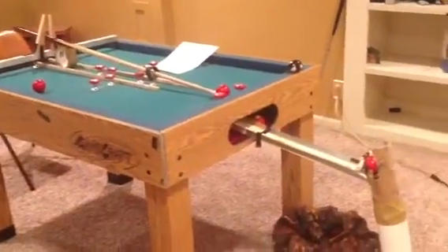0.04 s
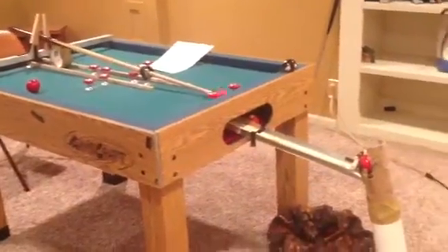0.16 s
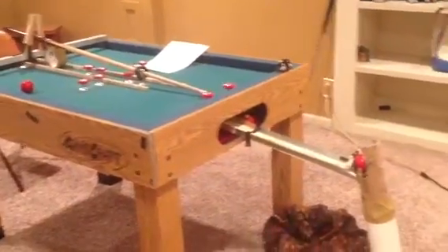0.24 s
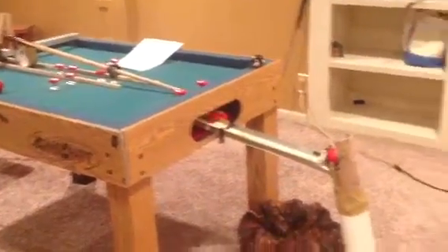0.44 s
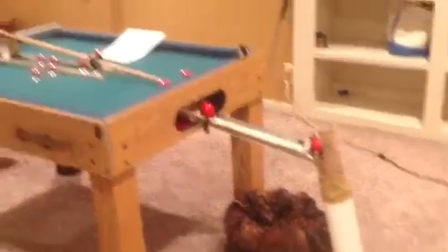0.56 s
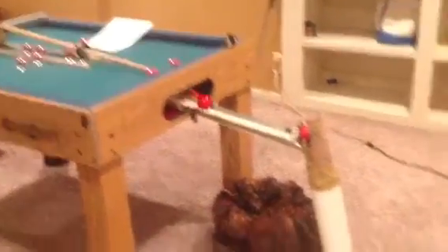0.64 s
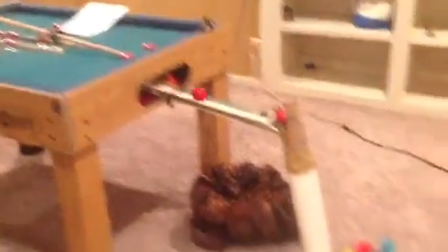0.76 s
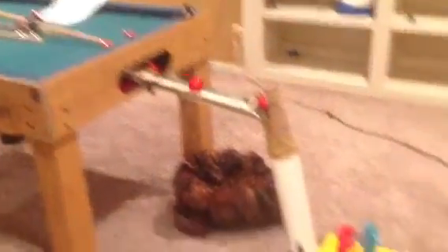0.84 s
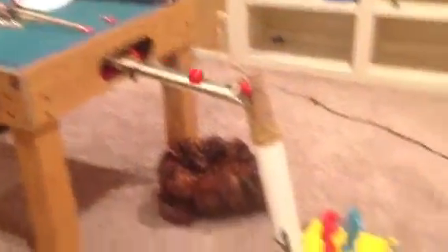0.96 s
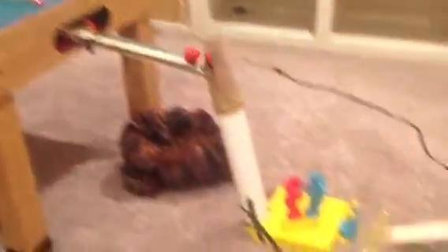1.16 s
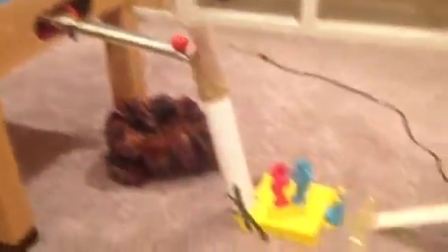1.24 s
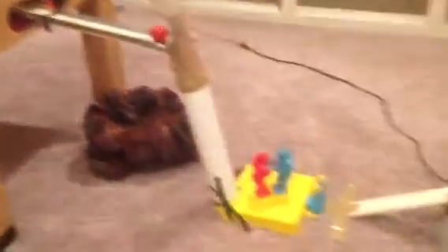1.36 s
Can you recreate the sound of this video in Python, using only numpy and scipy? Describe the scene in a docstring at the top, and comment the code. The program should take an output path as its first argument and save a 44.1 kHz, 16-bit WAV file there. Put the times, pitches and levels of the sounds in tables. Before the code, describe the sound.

In a quiet, slightly echoing room, a hard ball rattles against hollow wood and bounces onto a metal rail with bright, ringing clacks. A low roll follows, then a click against another ball and a soft bump on cardboard.

```python
"""Ball in a games table

A small hard ball knocks about in a wooden games table, where loose pieces tick, then clatters onto a
ringing metal track and rolls down it with a hollow rumble and one dull thud. At the far end it clacks
against a second ball, which bumps into a cardboard tube. Each blow is a short push that sets a body
sounding, and a quiet, fairly live room answers it."""
import sys
import numpy as np
from scipy import signal
from scipy.fft import rfft, irfft
from scipy.io import wavfile

SR = 44100
rng = np.random.default_rng(int(sys.argv[2]) if len(sys.argv) > 2 else 0)


def transcribe(u):
    """Save the signal u as a 16-bit wav file named by the first command-line argument.

    u: samples, shape (n,) or (channels, n), limited to [-1, 1]; the rate is SR.
    q: integer samples, one column per channel.
    """
    v = np.clip(np.atleast_2d(u).T, -1, 1)
    q = np.round(v * 32767).astype(np.int16)
    wavfile.write(sys.argv[1], SR, q)


N = 61739
T = np.arange(N) / SR

# spectrum of the dense crack of wood and cardboard: f/Hz, level/dB
WOOD_SPECTRUM = [(60, -54.5), (130, -9), (240, 1.5), (315, 1.5), (490, 5), (600, -2), (780, 7), (1070, 1.5),
                 (1300, 8.5), (1800, 8), (2400, -2.5), (3300, -8.5), (15000, -53)]
# spectrum of a thin tick: f/Hz, level/dB
TICK_SPECTRUM = [(1000, -32), (3800, -4.5), (6500, -2.5), (9000, -6), (15000, -1)]
WOOD_T60_S, TICK_T60_S = 0.07, 0.021


def table_knocks():
    """The ball knocks about in the table; harder contacts sound the wood more brightly."""
    # t/s, level/dB, contact corner f/Hz
    knocks = [(.179, -12, 680), (.2272, -6, 2420), (.2335, -9, 1700), (.2385, -3.5, 2090),
              (.2445, -4, 1820), (.265, -12, 2020), (.3105, 0, 3040), (.418, -7.5, 1750), (.468, -9, 510),
              (.509, -6.5, 900), (.536, -6, 1100), (.569, -14.5, 900), (.664, -7.5, 990), (.697, -12, 1620),
              (1.092, -24.5, 2160)]
    return strike(knocks, wood, room_db=-1.5)


def wood():
    """Response of the table: hollow modes under a dense crack."""
    # f/Hz, level/dB, t60/s
    table_modes = [(263, -1.5, 0.067), (361.6, -11, 0.28), (482, -1.5, 0.16), (532, -12.5, 0.48),
                   (707.4, 6.5, 0.086), (777, 3, 0.12), (836, -5.5, 0.51), (957, 5.5, 0.07),
                   (1243, 14, 0.052)]
    return undb(-7) * ring(table_modes) + undb(-4.5) * crack(WOOD_SPECTRUM, WOOD_T60_S)


def ball_clacks():
    """The hard ball gives short, bright clacks."""
    # t/s, level/dB, contact corner f/Hz
    clacks = [(.304, -17.5, 6000), (.3062, -4.5, 6500), (.3105, -0.5, 4230), (.3145, -6, 3800),
              (.3715, -3, 4440), (.3745, -4.5, 3130), (.418, -17, 5270), (.505, -12, 3300),
              (.667, -25.5, 5160), (.6975, -25.5, 5040)]
    # f/Hz, level/dB
    clack_spectrum = [(200, -43), (900, -12.5), (2700, 2), (4000, -4), (5200, -2.5), (6700, -14.5),
                      (8200, -14.5), (15000, -24.5)]
    return strike(clacks, lambda: undb(-3.5) * crack(clack_spectrum, t60=0.044), room_db=-5.5)


def metal_track():
    """The track clunks and rings on under the bouncing ball; each spot stirs its modes differently."""
    # t/s, level/dB, contact corner f/Hz
    blows = [(.3158, 4, 3000), (.3262, -12.5, 2500), (.3742, 1, 2610), (.4085, -1, 1680), (.5074, -2, 1640)]
    # long-ringing modes of the metal: f/Hz, level/dB, t60/s
    ringing_modes = [(1255, -2, .29), (1308, -2, .29), (1390, -2, .3), (1535, -8, .35), (1622, -4, .4),
                     (1690, -12, .3), (1728, -6, .42), (1805, -9, .4), (2595, -19, .35), (2950, -20, .3)]
    # its heavily damped modes: f/Hz, level/dB, t60/s
    clunk_modes = [(1339, -6, 0.056), (1460, -2, 0.019), (1666, -2, 0.023)]
    detune = 0.0053  # relative spread of each mode's pitch from blow to blow

    def ringing():
        stirred = [(hz * (1 + detune * rng.standard_normal()), db, t60) for hz, db, t60 in ringing_modes]
        partials = [rng.choice([-1, 1]) * undb(db) * ring([(hz, 0, t60)]) for hz, db, t60 in stirred]
        return undb(-5) * unit(sum(partials))

    clunk = undb(2) * ring(clunk_modes)
    return strike(blows, ringing, room_db=-4.5) + strike(blows, lambda: clunk, room_db=-4)


def ball_on_ball():
    """One ball clacks against the next and leaves a glassy ring."""
    # t/s, level/dB, contact corner f/Hz
    contact = [(1.1256, -12.5, 11900)]
    # f/Hz, level/dB
    clack_spectrum = [(200, -23), (1080, -6), (1290, 4.5), (2050, -0.5), (2300, 0.5), (3000, 4.5),
                      (3700, 9.5), (4500, 3), (5300, -1), (6900, -14.5), (8200, -6), (10500, -29),
                      (15000, -24)]
    # f/Hz, level/dB, t60/s
    glassy_modes = [(3490, -4, .4), (3607, -2, .35), (3725, -3, .4), (3989, -4, .36), (4199, -4, .4),
                    (4400, -4, .28), (5012, -4, .24), (8250, -4, .14)]
    clack = strike(contact, lambda: undb(0.5) * crack(clack_spectrum, t60=0.016), room_db=5)
    glassy = strike(contact, lambda: undb(-8) * ring(glassy_modes), room_db=-17)
    return clack + glassy


def cardboard_tube():
    """The second ball bumps into the tube: soft contacts on hollow, quickly damped modes."""
    # t/s, level/dB, contact corner f/Hz
    bumps = [(1.1912, -17, 1300), (1.198, -16.5, 560), (1.388, -26.5, 1120)]
    # f/Hz, level/dB, t60/s
    tube_modes = [(235.4, 4.5, 0.18), (480, 16, 0.04), (830, 5, 0.022), (876, -2.5, 0.11),
                  (900, 13.5, 0.043), (1239, 17.5, 0.058)]
    hollow = undb(2) * ring(tube_modes)
    return strike(bumps, lambda: hollow + undb(0.5) * crack(WOOD_SPECTRUM, WOOD_T60_S), room_db=7)


def loose_pieces():
    """Loose pieces and metal fittings tick on top of the knocks, each at its own pitch."""
    # t/s, level/dB, f/Hz (both ring pitch and contact corner)
    ticks = [(0.2275, -25.5, 7860), (.238, -29, 10100), (0.251, -26.5, 7670), (0.2661, -26.5, 8770),
             (0.3047, -19.5, 5500), (.3105, -19, 4700)]

    def tick(hz):
        ping = ring([(hz, 0, 0.012)])
        return undb(1.5) * crack(TICK_SPECTRUM, TICK_T60_S) + undb(-2) * ping

    return sum(strike([(s, db, hz)], lambda: tick(hz), room_db=1.5) for s, db, hz in ticks)


def light_touches():
    """The travelling ball makes a few faint, unpitched ticks."""
    # t/s, level/dB, contact corner f/Hz
    touches = [(.881, -34, 4100), (1.26, -22, 4440), (1.36, -31, 4500)]
    return strike(touches, lambda: crack(TICK_SPECTRUM, TICK_T60_S), room_db=1.5)


def thud():
    """One dull thud: a few low cycles that swell and die, faintly held by the room."""
    start_s, rise_s, pitch_hz = 0.7335, 0.0045, 157
    age = np.maximum(T - start_s, 0)
    swell = age / rise_s * np.exp(1 - age / rise_s)
    direct = undb(-24) * swell * np.sin(2 * np.pi * pitch_hz * age)
    reverb = np.linalg.norm(direct) * unit(through(direct, room()))
    return direct + undb(-19) * reverb


def rolling():
    """Once the ball is on the track, tiny bumps under it sound the table and merge into a rumble."""
    # loudness of the roll: t/s, level/dB
    level_curve = [(.42, -74), (.5, -45.5), (.8, -51.5), (.9, -54), (1.0, -48), (1.06, -49), (1.12, -39.5),
                   (1.18, -53), (1.4, -50)]
    # how the soft bumps weight the wood's sound: f/Hz, level/dB
    roll_spectrum = [(170, -7), (470, 2), (1200, -24), (4000, -22.5)]
    bumps_per_s, scatter_db = 1200, 3.5
    impulses = (rng.random(N) < bumps_per_s / SR) * rng.choice([-1, 1], N)
    bumps = impulses * undb(scatter_db * rng.standard_normal(N))
    bumps_in_room = bumps + through(bumps, room())
    rumble = colour(through(bumps_in_room, wood()), roll_spectrum)
    level_db = np.interp(T, *np.array(level_curve).T, left=-np.inf)
    return rumble / rumble.std() * undb(level_db)


def room():
    """Strong early reflections from table and walls, then a diffuse tail whose treble dies first."""
    # decay by band: f/Hz, t60/s
    decays = [(150, 0.94), (500, .48), (1400, 0.56), (3700, 0.55), (12000, 0.28)]
    gap_s, build_s = 0.001, 0.0034
    noise, hz = rfft(rng.standard_normal(N)), np.fft.rfftfreq(N, 1 / SR)
    tail = np.zeros(N)
    for centre, t60 in decays:
        band = on_log_axis([(f, f == centre) for f, _ in decays], hz)
        tail += irfft(noise * band, N) * fade(t60)
    early_lift = 1 + undb(3) * fade(t60=0.087)
    onset = np.clip((T - gap_s) / build_s, 0, 1)
    return unit(tail * early_lift * onset)


def room_tone():
    """A faint, steady bed of low noise."""
    # f/Hz, level/dB
    air_spectrum = [(40, -14.5), (160, 0), (320, -4), (600, -13), (1500, -14), (3500, -21.5), (15000, -30)]
    air = colour(rng.standard_normal(N), air_spectrum)
    return undb(-60.5) * air / air.std()


def strike(events, body, room_db):
    """Each contact is a short push, longer when softer, sounding the body and room from its own spot."""
    hit_gain_db = 11.5
    out = np.zeros(N)
    for s, db, corner_hz in events:
        start, response = int(s * SR), body()
        heard = response + undb(room_db) * unit(through(response, room()))
        push = signal.butter(2, min(corner_hz, .45 * SR), fs=SR)
        out[start:] += undb(db + hit_gain_db) * signal.lfilter(*push, heard)[:N - start]
    return out


def ring(modes):
    """Response of a set of decaying modes, each swinging up within its first cycle."""
    return unit(sum(undb(db) * fade(t60) * np.minimum(hz * T, 1) * np.sin(2 * np.pi * hz * T)
                    for hz, db, t60 in modes))


def crack(spectrum, t60):
    """Response of many short, crowded modes: a noise burst, evened out and then coloured."""
    burst = rfft(rng.standard_normal(N) * fade(t60))
    even = irfft(burst / np.sqrt(np.abs(burst)), N) * fade(2 * t60)
    return unit(colour(even, spectrum))


def colour(x, spectrum):
    """Minimum-phase filter shaped by (f/Hz, level/dB) points."""
    size = 4096
    gain = undb(on_log_axis(spectrum, np.fft.rfftfreq(size, 1 / SR)))
    cepstrum = irfft(np.log(gain))
    cepstrum[1:size // 2] *= 2
    cepstrum[size // 2 + 1:] = 0
    return through(x, irfft(np.exp(rfft(cepstrum))))


def on_log_axis(points, hz):
    """Interpolate (f/Hz, value) points along log frequency."""
    f, v = np.array(points, float).T
    return np.interp(np.log(np.maximum(hz, 1)), np.log(f), v)


def through(x, response):
    """Pass a sound through an impulse response."""
    return signal.fftconvolve(x, response)[:N]


def fade(t60):
    """Exponential decay by 60 dB in t60 seconds."""
    return np.exp(-np.log(1000) * T / t60)


def undb(db):
    """Decibels to gain."""
    return 10 ** (np.asarray(db) / 20)


def unit(x):
    """Scale to unit energy."""
    return x / np.sqrt(np.sum(x ** 2))


def scene():
    """The ball's run from table to track to tube, in mono over the room tone."""
    air = room_tone()
    table = loose_pieces() + light_touches() + table_knocks()
    track = ball_clacks() + metal_track() + thud() + rolling()
    far_end = ball_on_ball() + cardboard_tube()
    return (table + track + far_end + air)[None]


def record(dry):
    """The microphone thins the bass and rounds peaks; the recorder thins it again and cuts the top."""
    low_cut_hz, top_hz, ceiling = 95, 15300, 0.74
    low_cut = signal.butter(1, low_cut_hz, "high", fs=SR, output="sos")
    top_cut = signal.ellip(8, .2, 80, top_hz, fs=SR, output="sos")
    thin = signal.sosfilt(low_cut, dry)
    rounded = thin / (1 + (thin / ceiling) ** 8) ** (1 / 8)
    return signal.sosfilt(top_cut, signal.sosfilt(low_cut, rounded))


dry = scene()
out = record(dry)
transcribe(out)
```